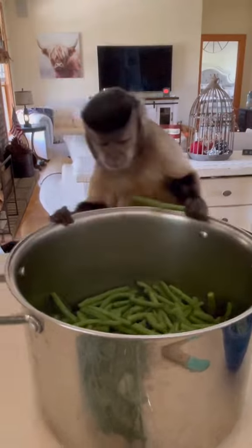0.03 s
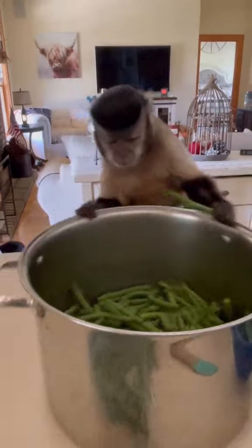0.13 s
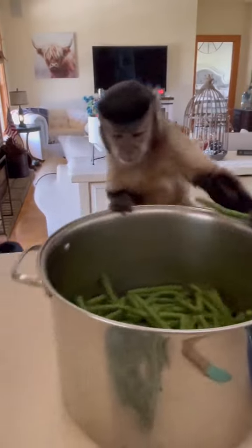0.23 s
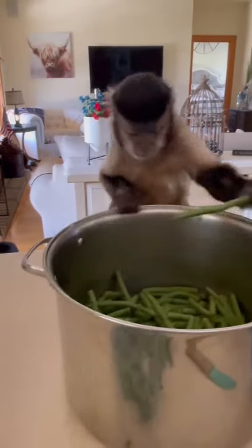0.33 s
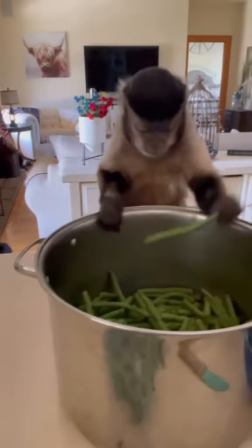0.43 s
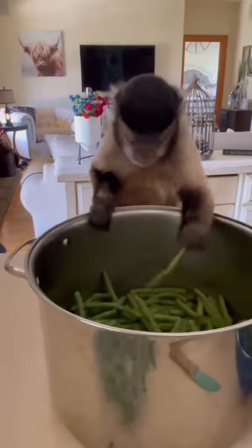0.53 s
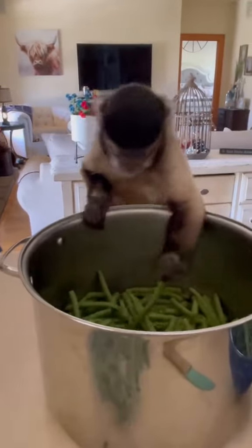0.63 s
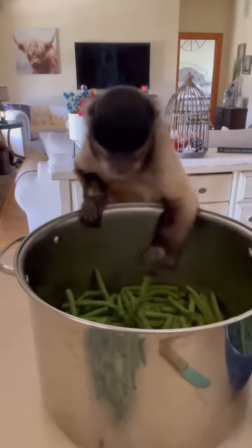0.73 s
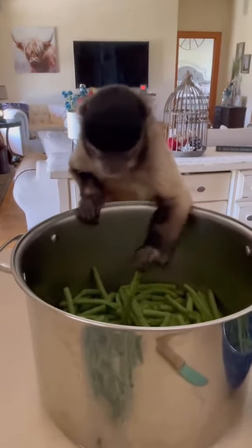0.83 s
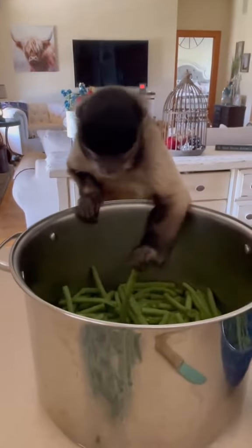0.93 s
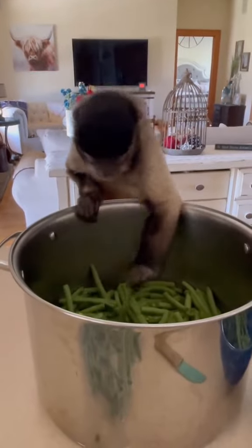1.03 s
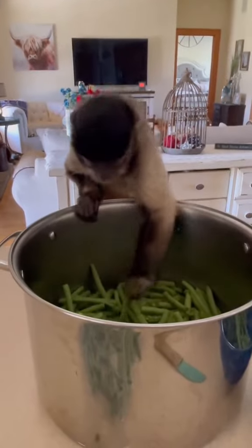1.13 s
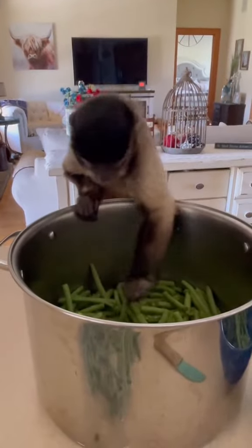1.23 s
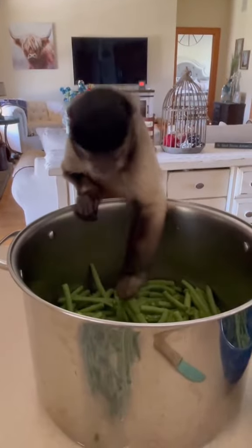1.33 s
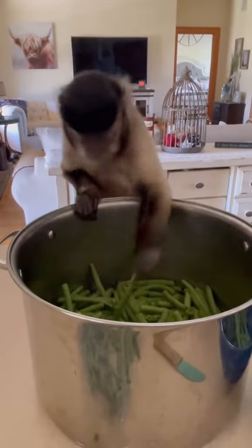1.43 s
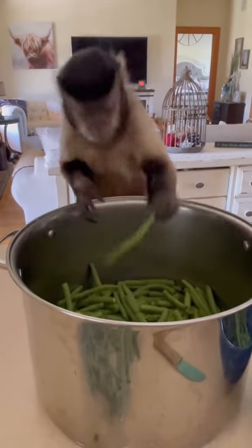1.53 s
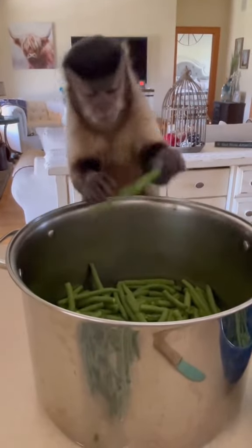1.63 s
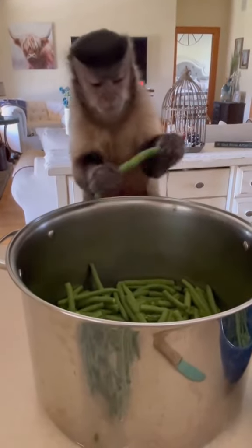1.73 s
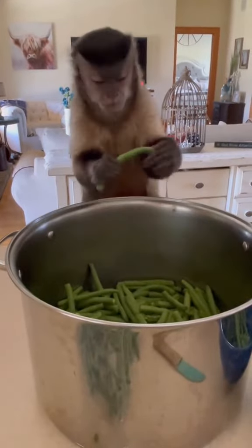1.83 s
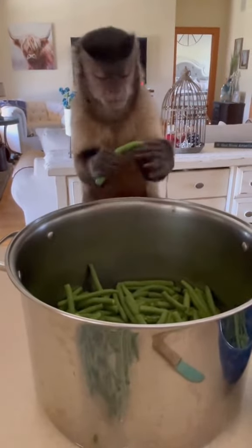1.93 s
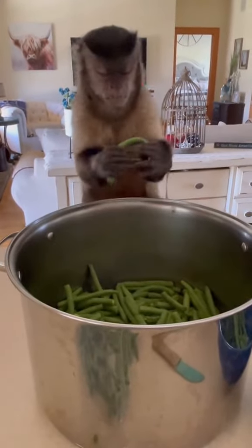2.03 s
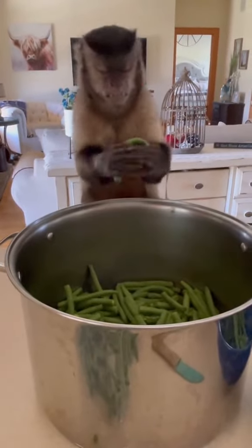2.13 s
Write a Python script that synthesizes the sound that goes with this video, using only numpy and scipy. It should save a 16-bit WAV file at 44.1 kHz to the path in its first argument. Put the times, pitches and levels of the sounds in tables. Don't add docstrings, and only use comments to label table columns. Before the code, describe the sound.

A loud clatter on a large steel pot follows a brief dry scrape, bounces once with a counter thump, then fades to soft thuds, faint rustles and tiny bean snaps; close microphone in a live kitchen.

```python
import sys
import numpy as np
from scipy import signal
from scipy.fft import rfft, irfft
from scipy.io import wavfile

SR = 44100
rng = np.random.default_rng(int(sys.argv[2]) if len(sys.argv) > 2 else 0)


def store_wav(level_fs):
    pcm = np.round(np.clip(np.atleast_2d(level_fs), -1, 1) * 32767)
    wavfile.write(sys.argv[1], SR, pcm.T.astype(np.int16))


def undo_db(level):
    steps = np.asarray(level, float) / 20
    return 10 ** steps


N = 97020

# t/s, level/dB
SLIDE_PRESSURE = [(0, -46.5), (.025, -47), (.085, -42.5), (.11, -43), (.16, -41), (.21, -41.5),
                  (0.324, -42), (.35, -59.5)]
# f/Hz, level/dB
SLIDE_COLOUR = [(88, -40), (150, -5), (664, -12.5), (743, -10.5), (2390, -8), (5370, -7), (9260, -16.5),
                (11000, -7.5), (13500, -26)]
# f/Hz, width/Hz, level/dB
SLIDE_PEAKS = [(745, 25, -5), (1400, 28, -4.5), (2760, 60, 1), (3955, 70, 7), (5230, 60, 2), (5540, 90, 4),
               (5800, 80, 0.5), (6310, 80, 1), (6870, 170, 2), (8080, 100, -2)]

# t/s, level/dB, rattle decay/s, tilt/(dB/octave)
STRIKES = [
    (0.2232, -16.5, 0.0095, 0.5),
    (0.2277, -17.5, 0.0038, 0.5),
    (0.2319, -22, 0.0055, -3.5),
    (0.241, -26.5, 0.028, -2),
    (0.272, -28.5, 0.03, -3.5),
    (0.3216, -23, 0.006, -6),
    (0.334, -26, 0.022, -9),
    (0.36, -35, 0.021, -9),
]
STRIKE_RING_DB = [2, -5, -4, -7.5, -3, 2, -8.5, -3.5]
# f/Hz, level/dB
RATTLE_COLOUR = [(180, -19.5), (300, -6.5), (650, -21.5), (1200, -14.5), (1600, -15), (3100, -9),
                 (4070, -12), (10700, -16), (14100, -34.5)]
# f/Hz, level/dB, t60/s
POT_MODES = [(287, -2, 0.12), (870, -9, 0.16), (963, -11, 0.1), (1162, -2, 0.14), (1299, -5, 0.11),
             (1877, -5, .12), (2059, -6, 0.1), (2314, -9, 0.14), (2404, -6, 0.16), (2676, -4, 0.12),
             (3098, -2, .08), (3542, -7, .07), (4743, -9, 0.07), (5611, -9, 0.07)]
# t/s, level/dB
TAPS = [
    (.812, -73),
    (.957, -63.5),
    (1.097, -72),
    (1.364, -70),
]
# f/Hz, level/dB, t60/s
TAP_MODES = [(330, -10, .08), (760, -8, .1), (1170, 0, .2), (1195, -10, .1), (1790, -8, .1),
             (1880, -10, .1)]

# t/s, level/dB, start f/Hz, end f/Hz, length/s
THUMPS = [(0.1092, -36.5, 1923, 200, 0.013), (0.117, -41.5, 160, 100, 0.02),
          (.2245, -31.5, 610, 330, 0.011), (0.228, -18, 317, 146.3, 0.016),
          (.232, -30.5, 110.7, 99.82, 0.061), (0.246, -33, 400, 285, 0.02), (.272, -29.5, 400, 170, 0.012),
          (.2835, -24, 300, 140, .01), (0.3228, -22.5, 1505, 250, 0.007), (0.327, -27, 129.2, 106.3, 0.022),
          (0.333, -28, 599, 201.3, 0.0067), (0.345, -28, 501, 260, 0.0069), (0.366, -30, 503, 224, 0.014),
          (0.383, -40.5, 138.9, 103, 0.033), (.612, -54, 150, 91, 0.022), (.638, -50, 120.3, 91, 0.019),
          (0.808, -60, 500, 249.5, 0.011), (0.818, -49.5, 121, 89, 0.025), (0.96, -50, 131.9, 82.2, 0.016),
          (0.986, -53, 120, 85.1, 0.018), (1.098, -50.5, 391, 170, 0.014), (1.107, -50, 151, 86.3, 0.012),
          (1.421, -55.5, 120.5, 90, 0.014)]
# f/Hz, level/dB, t60/s
COUNTER_MODES = [(90, 1.5, 0.2), (104, 4.5, 0.27), (165, -5.5, .12), (209, -3.5, 0.22), (279, -5, 0.25),
                 (335.8, -2.5, 0.2), (401, -5, 0.2), (494, -5.5, 0.2), (584.6, -1, 0.21), (774, -6.5, 0.7),
                 (984, -5.5, .2), (1671, -6.5, 0.23)]

# t/s, length/s, level/dB, tilt/(dB/octave)
RUSTLES = [(0.572, 0.05, -76, 0), (1.36, 0.04, -85, 0), (0.786, 0.037, -72.5, -1), (.92, 0.079, -73, -1),
           (1.055, 0.037, -78.5, 0.7), (1.63, .012, -84, 0), (2.008, 0.012, -72, 9), (2.14, .02, -80, 8),
           (2.171, .012, -70, 6)]
# f/Hz, level/dB
RUSTLE_COLOUR = [(600, -1), (1000, -6.5), (1900, -11.5), (3000, -14), (7500, -10.5), (8950, -21.5),
                 (10700, -5.5), (13000, -27)]
# f/Hz, level/dB
DRAG_COLOUR = [(1300, -24.5), (2200, -19.5), (2700, 6.5), (3300, 13), (5000, -0.5), (7800, -8),
               (10700, -6.5), (13000, -32)]
# f/Hz, width/Hz, level/dB
DRAG_PEAKS = [(2611, 50, 3.5), (3170, 52, 6), (3434, 65, 6), (4020, 67, -4), (4405, 91, 5), (5160, 74, -3),
              (6160, 120, 1), (7390, 150, -11)]
# t/s, length/s, f/Hz, width/Hz, level/dB
SQUEAK = (1.59, .065, 2540, 130, -85)

# t/s, level/dB
CREAKS = [(2.0258, -49), (2.0266, -54), (2.028, -58), (2.0305, -63), (2.144, -70), (2.1488, -57),
          (2.1497, -62), (2.152, -62), (2.1725, -54), (2.1735, -56), (2.1762, -59), (2.178, -60),
          (2.1793, -49), (2.182, -60), (2.193, -63)]
# f/Hz, level/dB, t60/s
BEAN_MODES = [(2560, -2, .012), (4130, -6, 0.0053), (5760, 2, 0.0067), (6580, 1, 0.0057), (8080, 0, 0.0067),
              (10400, 1, 0.0046), (11364, 3, 0.016)]
# f/Hz, level/dB
BEAN_COLOUR = [(2300, -5), (3000, -3), (4200, -8), (5500, 0), (12000, 3), (14000, -8)]

# f/Hz, level/dB
ROOM_SEND = [(60, -18), (200, -13), (400, -6), (700, 0), (15000, 0)]
# f/Hz, t60/s
ROOM_T60 = [(100, .5), (300, 0.56), (1000, 0.64), (2200, 0.66), (3500, 0.5), (6000, .42), (9000, 0.22),
            (12000, .3)]
# f/Hz, side re mid/dB
NEAR_SIDE = [(60, -45.5), (110, -47.5), (200, -37.5), (370, -20.5), (670, -11), (1220, -19.5), (2230, -12),
             (4080, -4.5), (7450, -6.5), (13600, -6.5)]
# f/Hz, side re mid/dB
FAR_SIDE = [(60, -28.5), (110, -29.5), (200, -24), (370, -9.5), (670, 0.5), (1220, -8), (2230, -6.5),
            (4080, -1), (7450, -3.5), (13600, -5.5)]
# f/Hz, level/dB
AIR_COLOUR = [(44, -47), (75, -14), (124, -5), (234, -10.5), (370, -15.5), (404, -26.5), (432, -18.5),
              (640, -29.5), (14000, -56)]
# f/Hz, level/dB
HUM_LINES = [(42.2, -75), (51.1, -65.5), (58.9, -72), (118.4, -78), (161.5, -80)]


def read(points, hz):
    f, value = np.transpose(points)
    return np.interp(np.log(hz + 1), np.log(f + 1), value)


def evened(x):
    return x / np.sqrt(np.mean(x ** 2) + 1e-20)


def peaked(x):
    return x / abs(x).max()


def add(mix, start_s, sound):
    part = mix[round(start_s * SR):][:len(sound)]
    part += sound[:len(part)]


def colour(x, points, tilt_db=0.):
    hz = np.abs(np.fft.fftfreq(4096, 1 / SR))
    edge_db = -24 * np.maximum(np.log2(points[0][0] / (hz + 1)), 0) - 60 * (hz > 15600)
    gain_db = read(points, hz) + edge_db + tilt_db * np.log2((hz + 100) / 3000)
    log_gain = np.log(undo_db(gain_db))
    taps = np.fft.ifft(np.exp(np.conj(signal.hilbert(log_gain)))).real[:2048]
    return signal.oaconvolve(x, taps)[:len(x)]


def ring(x, modes):
    t = np.arange(SR // 2) / SR
    body = sum(undo_db(db - 60 * t / t60) * np.sin(2 * np.pi * hz * t) for hz, db, t60 in modes)
    return signal.oaconvolve(x, body)[:len(x)]


def grit(size, per_s, spread_db):
    hit, sign, strength = rng.random(size), rng.standard_normal(size), rng.exponential(1, size)
    return (hit < per_s / SR) * sign * undo_db(spread_db * np.minimum(strength, 5))


def rub(size, points, peaks, ring_db, per_s, spread_db):
    g = grit(size, per_s, spread_db)
    modes = [(hz, db + 10 * np.log10(width), 2.8 / width) for hz, width, db in peaks]
    surface = evened(colour(g, points))
    return evened(surface + undo_db(ring_db) * evened(ring(g, modes)))


def slide():
    s, db = np.transpose(SLIDE_PRESSURE)
    t = np.arange(N) / SR
    level_db = np.interp(t, s, db) - 600 * np.maximum(t - s[-1], 0)
    return undo_db(level_db) * rub(N, SLIDE_COLOUR, SLIDE_PEAKS, ring_db=-4.5, per_s=8300, spread_db=2)


def pot():
    damped_t60_s, ring_level_db = .17, 1.5
    out, t = np.zeros(N), np.arange(SR // 2) / SR
    damped = [(hz, db, min(t60, damped_t60_s)) for hz, db, t60 in POT_MODES]
    for (s, db, length_s, tilt_db), ring_db in zip(STRIKES, STRIKE_RING_DB):
        shape = np.minimum(t / 0.0015, 1) * np.exp(-t / length_s)
        rattle = shape * evened(colour(grit(len(t), 9000, 2), RATTLE_COLOUR, tilt_db))
        blow = colour(1. * (t == 0), [(200, 0.00039), (6000, 0.0032)], tilt_db)
        late = rng.integers(0, 90, len(damped))
        steel = sum(np.roll(ring(blow, [mode]), lag) for mode, lag in zip(damped, late))
        add(out, s, undo_db(db) * (rattle + undo_db(ring_level_db + ring_db) * peaked(steel)))
    return out


def taps():
    out, rise_s = np.zeros(N), .01
    tap = ring(np.r_[signal.windows.hann(20), np.zeros(9000)], TAP_MODES)
    tap = peaked(tap * np.minimum(np.arange(len(tap)) / SR / rise_s, 1))
    for s, db in TAPS:
        add(out, s, undo_db(db) * tap)
    return out


def thumps():
    sweep_s, board_db = .0028, -13
    out, t = np.zeros(N), np.arange(SR // 3) / SR
    detune = rng.uniform(0.5, 1, (len(THUMPS), len(COUNTER_MODES)))
    for (s, db, top_hz, low_hz, length_s), twist in zip(THUMPS, detune):
        hz = low_hz + (top_hz - low_hz) * np.exp(-t / sweep_s)
        shape = np.minimum(t / 0.0006, 1) * np.exp(-(t / length_s) ** 3)
        thud = -shape * np.sin(2 * np.pi * np.cumsum(hz) / SR)
        modes = [(f * (1 + 0.0084 * u), d, t60) for (f, d, t60), u in zip(COUNTER_MODES, twist)]
        add(out, s, undo_db(db) * (thud + undo_db(board_db) * peaked(ring(thud, modes))))
    return out


def rustles():
    out, t = np.zeros(N), np.arange(SR // 3) / SR
    for s, length_s, db, tilt_db in RUSTLES:
        shape = np.clip(np.minimum(t / 0.0067, (length_s - t) / 0.023 + 1), 0, 1)
        brush = colour(grit(len(t), 14000, 2.5), RUSTLE_COLOUR, tilt_db)
        add(out, s, undo_db(db) * shape * evened(brush))
    return out


def drag():
    start_s, rise_s, t60_s, level_db = 1.452, .032, .17, -63
    out, t = np.zeros(N), np.arange(SR // 3) / SR
    shape = np.minimum(t / rise_s, 1) ** 3 * undo_db(-60 * np.maximum(t - rise_s, 0) / t60_s)
    friction = rub(len(t), DRAG_COLOUR, DRAG_PEAKS, ring_db=-4, per_s=18000, spread_db=1.5)
    add(out, start_s, undo_db(level_db) * shape * friction)
    return out


def squeak():
    out, t = np.zeros(N), np.arange(SR // 3) / SR
    s, length_s, hz, width_hz, db = SQUEAK
    tone = evened(ring(grit(len(t), 3800, 1.5), [(hz, 0, 2.9 / width_hz)]))
    shape = np.sqrt(np.sin(np.pi * np.minimum(t / length_s, 1)).clip(0))
    add(out, s, undo_db(db) * shape * tone)
    return out


def creaks():
    bean_t60_s, snap_db = .0045, 19
    out = np.zeros(N)
    modes = [(hz, db, min(t60, bean_t60_s)) for hz, db, t60 in BEAN_MODES]
    for (s, db), twist in zip(CREAKS, rng.standard_normal((len(CREAKS), 30))):
        snap = np.r_[twist * np.hanning(30), np.zeros(2000)]
        creak = colour(ring(snap, modes) + undo_db(snap_db) * snap / 10, BEAN_COLOUR)
        add(out, s - .0004, undo_db(db) * peaked(creak))
    return out


def pair(mid, other, side_db):
    hz = np.fft.rfftfreq(len(mid), 1 / SR)
    side = irfft(rfft(other) * undo_db(read(side_db, hz)), len(mid))
    return np.array([mid + side, mid - side])


def room(x):
    wet_db, early_db = -9.5, -6
    sparse = np.zeros((2, SR))
    at = np.arange(200, SR - 20, 20) + rng.integers(0, 20, (2, (SR - 201) // 20))
    np.put_along_axis(sparse, at, rng.choice([-1., 1.], at.shape), 1)
    hz, t, z = signal.stft(sparse, SR, nperseg=512)
    decay = undo_db(-60 * t / read(ROOM_T60, hz)[:, None])
    tail = signal.istft(z * decay, SR, nperseg=512)[1][:, :SR]
    tail = undo_db(wet_db) * pair(*tail, FAR_SIDE) / np.linalg.norm(tail[0])
    near = np.zeros((2, SR))
    signs = np.tile([-1., 1.], (2, 3)) / np.sqrt(6)
    np.put_along_axis(near, rng.integers(60, 400, (2, 6)), signs, 1)
    early = pair(undo_db(early_db) * near[0], near[1], NEAR_SIDE)
    return signal.fftconvolve(x[None], tail + early, axes=1)[:, :N]


def hum():
    t = np.arange(N) / SR - 1.42
    return sum(np.sqrt(2) * undo_db(db) * np.cos(2 * np.pi * f * t) for f, db in HUM_LINES)


def air():
    tone_db, hiss_db = -70.5, -89
    hz = np.fft.rfftfreq(N, 1 / SR)
    gain = undo_db(read(AIR_COLOUR, hz)) * (hz > 30)
    a, b = irfft(rfft(rng.standard_normal((2, N))) * gain, N)
    hiss = undo_db(hiss_db) * rng.standard_normal((2, N))
    return undo_db(tone_db) * evened(pair(a, b, FAR_SIDE)) + hiss


def scene():
    near = slide() + pot() + taps() + thumps() + rustles() + drag() + squeak()
    bean = creaks()
    sent = near + undo_db(-7) * bean
    return near + bean + room(colour(sent, ROOM_SEND)) + hum() + air()


def low_pass(x):
    return signal.sosfilt(signal.butter(12, 14210, fs=SR, output="sos"), x)


def record(dry):
    notch_hz, notch_width_hz, notch_db = 9100, 490, -5.5
    top_hz, top_db_per_khz = 13100, -12.5
    hz = np.fft.rfftfreq(N, 1 / SR)
    dip_db = notch_db * np.exp(-((hz - notch_hz) / notch_width_hz) ** 2)
    top_db = top_db_per_khz * np.maximum(hz - top_hz, 0) / 1000
    mix = irfft(rfft(dry) * undo_db(dip_db + top_db), N)
    return low_pass(mix)


dry = scene()
out = record(dry)
store_wav(out)
```